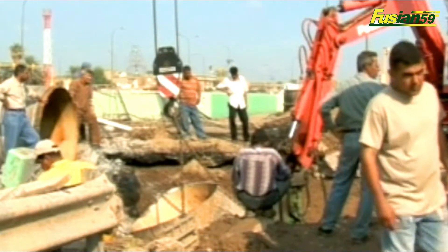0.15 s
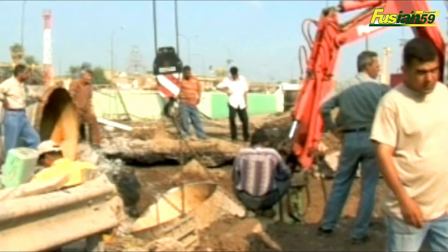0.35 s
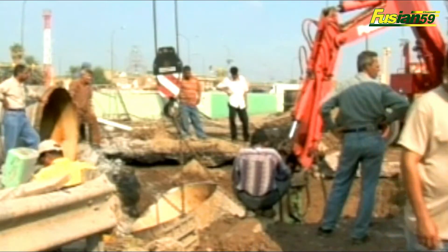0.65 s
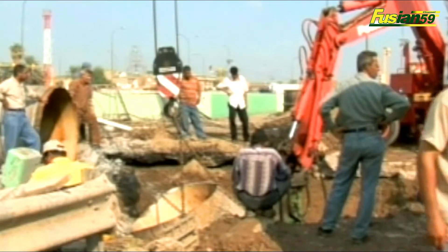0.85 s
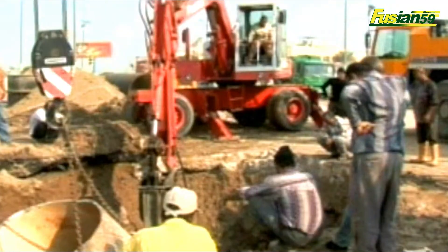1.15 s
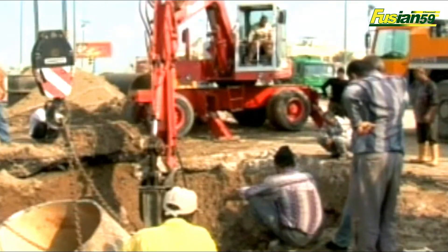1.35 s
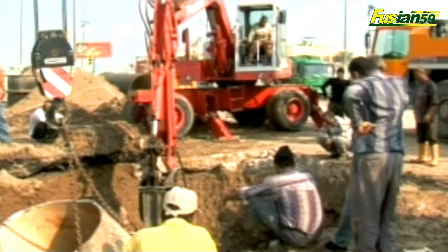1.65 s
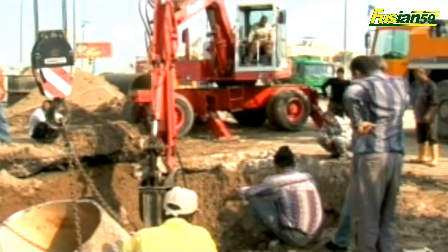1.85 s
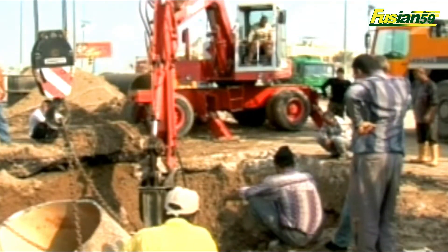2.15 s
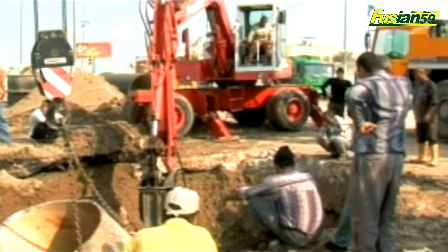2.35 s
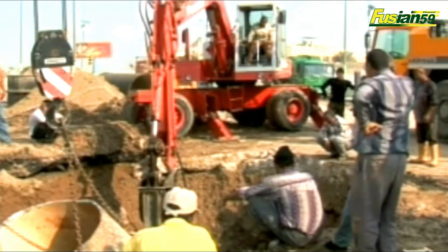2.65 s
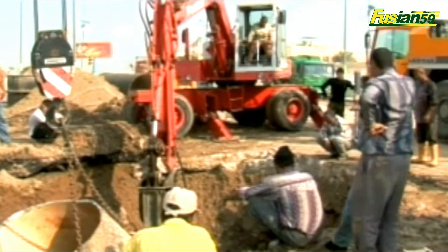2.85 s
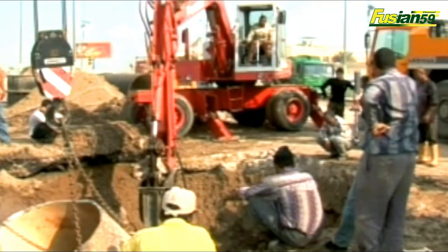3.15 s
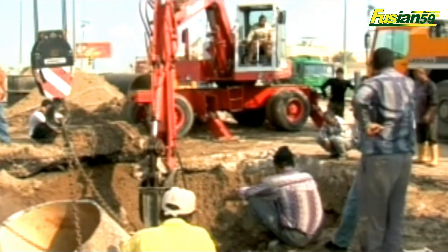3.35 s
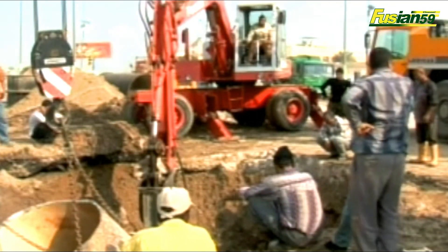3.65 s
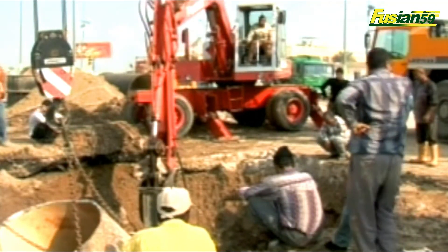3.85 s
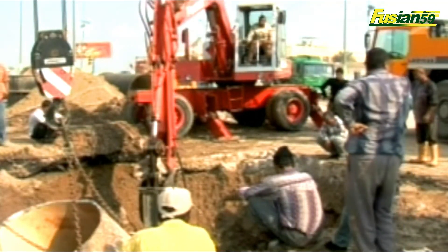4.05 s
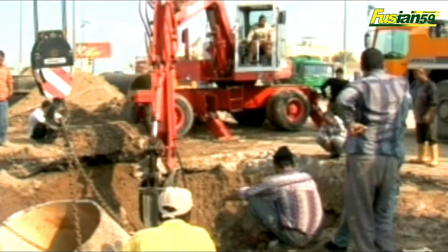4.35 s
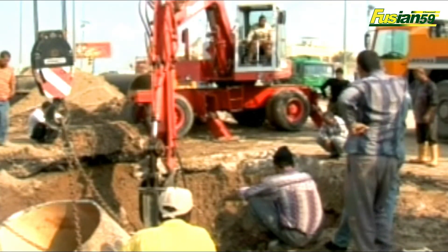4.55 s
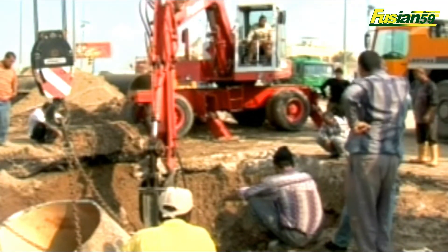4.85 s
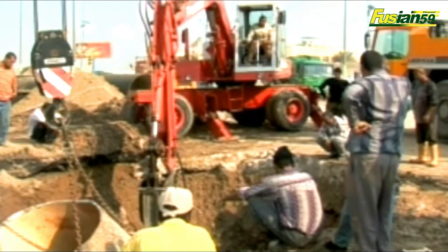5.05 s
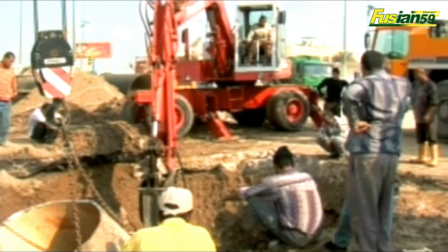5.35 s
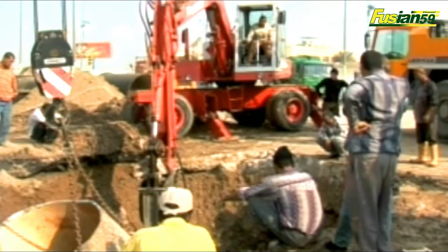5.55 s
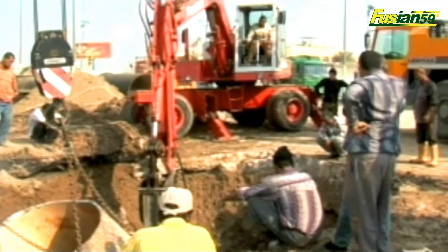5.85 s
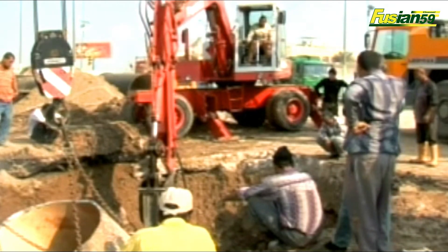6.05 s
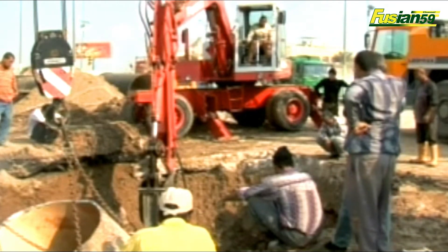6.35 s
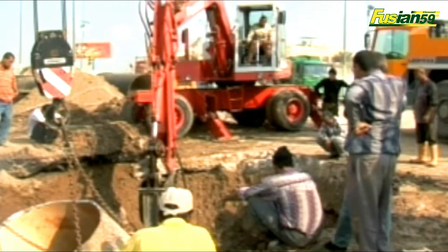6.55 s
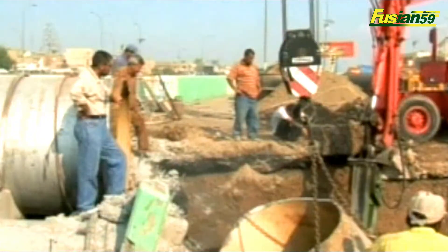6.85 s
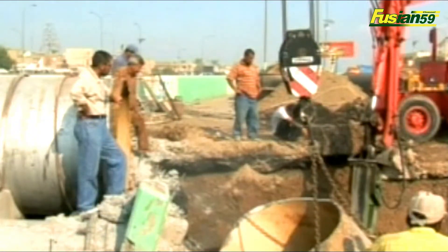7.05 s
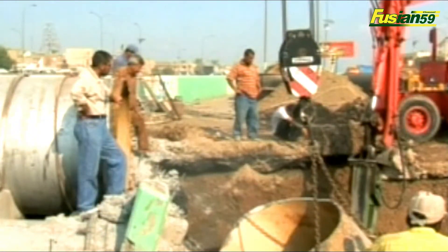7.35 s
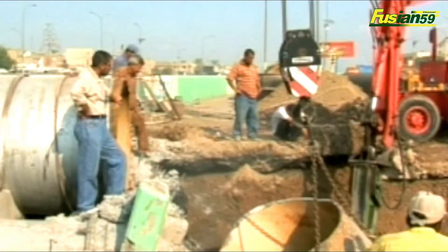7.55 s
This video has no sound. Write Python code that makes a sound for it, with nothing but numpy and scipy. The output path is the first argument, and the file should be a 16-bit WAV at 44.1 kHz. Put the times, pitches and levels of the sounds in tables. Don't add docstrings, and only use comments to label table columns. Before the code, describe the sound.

On an open building site an excavator's hydraulic breaker pounds about four and a half times a second, each blow a dense thud with ringing steel. Diesels rumble behind. After a second the view moves to the front, louder and more ringing. Midway the sound dips quickly almost to silence and returns. Near the end hammering cuts out, leaving idling engines, valve clatter and whining, hissing pump bursts.

```python
import sys
import numpy as np
from scipy import signal
from scipy.fft import rfft, irfft
from scipy.io import wavfile
from scipy.ndimage import uniform_filter1d

SR = 44100
rng = np.random.default_rng(int(sys.argv[2]) if len(sys.argv) > 2 else 0)


def elevation(decibels):
    levels = np.asarray(decibels, float)
    return 10 ** (levels / 20)


def store_pcm(level_fs):
    pcm = np.round(np.clip(level_fs, -1, 1) * 32767).astype(np.int16)
    wavfile.write(sys.argv[1], SR, np.atleast_2d(pcm).T)


N = 340452
LENGTH = 2 ** 15

# hz, level_db, t60_s
LONG_RINGS = [(396, -9, .4), (422, -3, .36), (805, -2, .42), (1294, -14, .5), (1851, -10, .6),
              (1884, -5.5, .66)]
LONG_RINGS += [(2540, -16, .42), (3265, -13, .34), (3298, -14, .42), (4200, -14, .22), (6080, -29, .26)]


def ramp(start_s, length_s):
    return np.clip((np.arange(N) / SR - start_s) / length_s, 0, 1)


def walk(rate_hz):
    k = int(SR / rate_hz)
    held = np.repeat(rng.standard_normal(N // k + 1), k)
    return uniform_filter1d(uniform_filter1d(held, k), k)[:N]


def bell(length, hz, octaves):
    frequency = np.fft.rfftfreq(length, 1 / SR) + 1
    shape = np.exp(-(np.log2(frequency / hz) / octaves) ** 2)
    return shape / np.sqrt(np.mean(shape ** 2))


def band(white, hz, octaves):
    length = 2 * white.shape[-1] - 2
    return irfft(white * bell(length, hz, octaves), length)


def rumble(spectrum, level_db):
    hz, density_db = np.transpose(spectrum)
    white, out = rfft(rng.standard_normal(2 ** 19)), 0
    for centre_hz in 28 * 2 ** np.arange(0, 9.2, .5):
        band_db = np.interp(np.log(centre_hz), np.log(hz), density_db) + 10 * np.log10(centre_hz)
        out = out + elevation(band_db + 1.74 * walk(14)) * band(white, centre_hz, 1 / 3)[:N]
    return elevation(level_db) * out / out.std()


def working_engines():
    # hz, level_db (per Hz)
    working = [(15, -47), (25, -25), (285, -3), (694, -6.5), (812, 2), (1110, -16), (1300, -2.5),
               (1730, -14), (3250, -18.5), (13000, -46)]
    return rumble(working, -50.0)


def valve_clatter(white, phase):
    # hz, width_hz, level_db
    covers = [(1077, 70, 1), (2400, 250, -5), (2957, 40, 2.5), (3680, 51, -12)]
    pulse = np.exp(0.86 * (np.cos(phase) - 1))
    clatter = sum(elevation(db) * np.sqrt(width) * band(white, hz, width / hz)[:N] for hz, width, db in covers)
    return pulse * clatter / clatter.std()


def loaded_pump(white, phase):
    # start_s, length_s, whine_db
    pump_loads = [
        (6.8, .23, -70.5),
        (7.068, .02, -70),
        (7.157, .015, -75),
        (7.27, 0.41, -72.5),
    ]
    whine_hz, hiss_hz, slew_s, hiss_db = 4860, 7750, 0.011, -12.5
    load = 0
    for start_s, length_s, db in pump_loads:
        load = load + elevation(db) * ramp(start_s, slew_s) * (1 - ramp(start_s + length_s, slew_s))
    tone = np.sin(2 * np.pi * np.cumsum(whine_hz * (1 + .012 * walk(200))) / SR)
    throb = 1 + .85 * np.cos(4 * phase)
    whine = load * elevation(-.5 + 3.5 * walk(110)) * throb * tone
    flow = bell(2 ** 19, hiss_hz, .09) + elevation(7.5) * bell(2 ** 19, whine_hz, 0.65)
    hiss = load * elevation(hiss_db + 4.5) * irfft(white * flow)[:N]
    return whine + hiss


def idling_site():
    # hz, level_db (per Hz)
    idling = [(15, -46), (25, -16), (293, -0.5), (1050, -3.5), (2440, -8.5), (2700, -16), (3000, -9),
              (3420, -14.5), (4940, -22.5), (13000, -36.5)]
    level_db, clatter_hz = -54.5, 20.77
    white = rfft(rng.standard_normal(2 ** 19))
    phase = 2 * np.pi * np.cumsum(clatter_hz * (1 + 0.025 * walk(1.9))) / SR
    clatter = elevation(level_db - 6.0) * valve_clatter(white, phase)
    return rumble(idling, level_db) + clatter + loaded_pump(white, phase)


def blow_run(first_s, period_s, db, count, slowing=((0, 0), (1, 0)), sag_db=0):
    periods = period_s + np.interp(np.arange(count), *np.transpose(slowing))
    start_s = first_s + np.cumsum(periods) - periods
    return np.transpose([start_s, db + sag_db * (start_s - first_s)])


def place(blows, sounds, lag_s):
    track = np.zeros(N + 2 * SR)
    for (start_s, db), sound in zip(blows, sounds):
        i = int((start_s + lag_s + 1) * SR)
        track[i:i + len(sound)] += elevation(db) * sound
    return track[SR:SR + N]


def housing(modes, peak_s, level_db):
    t = np.arange(LENGTH) / SR
    swell = (t / peak_s * np.exp(1 - t / peak_s)) ** 2
    tones = sum(elevation(db) * np.cos(2 * np.pi * hz * (t - peak_s)) for hz, db in modes)
    return elevation(level_db) * swell * tones


def shaking(blows, body, plates, echo_s, echo_db, strike=0.5, linger=1.3, drift=0.12):
    t = np.arange(LENGTH // 2) / SR
    f = np.fft.rfftfreq(len(t), 1 / SR)
    colour = 1 + sum((elevation(db) - 1) / (1 + (2 * (f - hz) / width) ** 2) for hz, width, db in plates)
    white = colour * rfft(rng.standard_normal((len(blows) + 2, len(t))))
    hz, *columns = np.transpose(body)
    same, loose = 0, 0
    for centre_hz in 40 * 2 ** (np.arange(26) / 3):
        db, rise, t60, like = (np.interp(np.log(centre_hz), np.log(hz), c) for c in columns)
        like = np.clip(like, 0, 1)
        onset = np.minimum(t / 0.0035, 1) ** 2
        swell = elevation(db) * onset * (1 - (1 - strike) * np.exp(-(t / rise) ** 2))
        late = np.maximum(t - echo_s, 0)
        echo = elevation(echo_db - 60 * late / t60) * np.minimum(late / 0.0079, 1)
        shape = swell * (elevation(-60 * t / t60) + echo)
        noise = band(white, centre_hz, 1 / 4)
        same = same + np.sqrt(like) * shape * noise[:2]
        loose = loose + np.sqrt(1 - like) * swell * elevation(-60 * t / (linger * t60)) * noise[2:]
    turn = drift * np.array(blows)[:, :1]
    return np.cos(turn) * same[0] + np.sin(turn) * same[1] + loose


def steel(modes, bright_db, rise_s, lead_s, scatter, twin_db, split):
    t = np.arange(LENGTH) / SR
    hz, db, t60 = np.transpose(sorted(modes))[..., None]
    high = hz / 4000
    sense = (-1) ** np.arange(len(hz))[:, None]
    grow = 1 - np.exp(-(t / (rise_s * (0.5 + high))) ** 2)
    rings = sense * elevation(db - 60 * t / t60) * grow * np.exp(2j * np.pi * hz * (t + lead_s))
    offset_hz = hz * split * (1 + rng.random(hz.shape)) * sense
    twins = elevation(twin_db) * np.minimum(high, 1) ** 2 * rings * np.exp(2j * np.pi * offset_hz * t)
    draws = rng.standard_normal((len(bright_db), 4, len(hz)))
    size, turn, real, imag = np.moveaxis(draws, 1, 0)
    bright = elevation(np.outer(bright_db, high))
    load = np.exp(scatter * np.minimum(0.19 + high.T ** 2, 1) * (size + 1j * turn))
    ring = (bright * load) @ rings + (bright * (real + 1j * imag)) @ twins
    return ring.imag * np.minimum(20 * (t[-1] - t), 1)


def breaker(blows, body, plates, modes, bright_db, body_db, steel_db, echo_s, echo_db, rise_s, lead_s):
    ring = steel(modes, bright_db, rise_s, lead_s, scatter=0.36, twin_db=-3.0, split=0.0061)
    ring[:, :LENGTH // 2] += elevation(body_db - steel_db) * shaking(blows, body, plates, echo_s, echo_db)
    return elevation(steel_db) * ring


def side_breaker(blows):
    # hz, level_db, rise_s, t60_s, likeness (of blows, 0-1)
    body = [(50, -55, .02, 0.29, .95), (100, -28, 0.031, 0.47, 0.7), (203, -5, 0.0025, 0.21, 0.9),
            (330, -10.5, 0.0027, 0.23, 1), (786, -0.5, 0.01, 0.25, 0.91), (1570, -4.5, 0.012, 0.17, 0.94),
            (2150, -9, 0.01, 0.23, 1), (3480, -7.5, 0.014, 0.19, 0.9), (7000, -10.5, 0.0031, .17, 0.5),
            (10500, -11.5, 0.0031, 0.095, 0), (13500, -34, .003, 0.11, .1)]
    # hz, width_hz, lift_db
    plates = [(335, 70, 6.5), (568, 29, 4.5), (750, 69, 4), (1564, 130, 11.5), (2650, 96, 8),
              (3280, 370, 8), (4090, 120, 10.5)]
    # hz, level_db, t60_s
    modes = [(325, -5, 0.25), (429, -13.5, 0.49), (523.4, -9.5, 0.42), (790, -5, 0.33), (954, -6, 0.3),
             (1192, -13.0, 0.39), (1336, -12.5, 0.47), (1560, -18, 0.22), (1900, -15.5, 0.39),
             (2460, -33, 0.27), (2515, -15.5, 0.38), (3230, -10.5, 0.31), (3490, -32, 0.47),
             (3520, -18, 0.25), (4050, -5, 0.13), (4200, -11.5, 0.23), (4180, -3, 0.16), (4926, -42, 0.48),
             (5900, -27, 0.2), (7418, -10, 0.16), (105.3, -5, 0.2), (3300, -11.5, 0.34),
             (7000, -17.5, 0.23), (748.0, 3, .12), (1644, -6, .1)]
    bright_db = [-3, 0.5, 1, -1.5, 3.5, 3.5]
    # hz, level_db
    boom = [(325, 0)]
    sounds = breaker(blows, body, plates, modes, bright_db, body_db=-6, steel_db=1,
                     echo_s=0.0077, echo_db=-7, rise_s=0.025, lead_s=.003)
    return sounds + housing(boom, peak_s=.009, level_db=9)


def front_breaker(blows):
    # hz, level_db, rise_s, t60_s, likeness (of blows, 0-1)
    body = [(49.6, -39.5, 0.01, 0.6, 0.72), (107, -30.5, 0.044, 0.61, 0.75), (205, -17, 0.013, 0.2, 0.87),
            (402, -10, 0.0023, 0.28, 0.9), (1040, -3.5, 0.023, 0.15, 0.99), (1795, 0, 0.0025, 0.2, 0.6),
            (2690, -9, 0.0072, 0.19, 0.61), (3700, -5, 0.0095, 0.17, 0.84),
            (7040, -16.5, 0.0045, 0.2, 0.68), (10500, -17.5, 0.0023, 0.13, 0.056),
            (13500, -39, .003, .12, .1)]
    # hz, width_hz, lift_db
    plates = [(400, 42, 8.6), (834.4, 52, 14.3), (953, 25, 6.7), (1277, 255, 8.5), (1873, 42, 8),
              (3347, 236, 10.7), (3980, 300, 5.5), (6200, 100, 3.5), (7050, 1500, 2.8)]
    # hz, level_db, t60_s
    modes = [(104.8, -18, 0.33), (678.7, -6.5, 0.25), (933, -10, 0.2), (960, -3, 0.25), (978.7, -11, 0.095),
             (1177, -1.0, 0.19), (1238, 11.0, 0.073), (1466, -5.0, 0.23), (1552, -1.0, 0.13),
             (1730, -28, 0.18), (2274, -9, 0.22), (2386, -12.5, 0.28), (3286, -6, 0.12), (3517, -4.5, 0.15),
             (3880, -5.0, 0.1), (4970, -15, 0.21), (7000, -22, 0.29)] + LONG_RINGS
    # hz, level_db
    boom = [(915, -8), (940, -4), (973, -0.5)]
    sounds = breaker(blows, body, plates, modes, np.zeros(len(blows)), body_db=-4.5, steel_db=-1.0,
                     echo_s=0.032, echo_db=-17.5, rise_s=0.011, lead_s=0.003078)
    return sounds + housing(boom, peak_s=.023, level_db=0.5)


def scene():
    # first_s, period_s
    side_run = (-.19335, .22945)
    front_run = (.8899, .22268)
    later_run = (2.9379, .2223)
    # blow_number, longer_s
    binding = [
        (0, 0),
        (10, .0016),
        (16, .0006),
    ]
    front_cut_s, dip_s, idle_cut_s, cut_s = 1.0535, 2.92, 6.7577, .002
    fade_s, fade_bend = 0.11, 0.74

    engines = working_engines()
    aside = blow_run(*side_run, db=-28.5, count=6)
    ahead = blow_run(*front_run, db=-24.5, count=10)
    later = blow_run(*later_run, db=-24, count=18, slowing=binding, sag_db=-0.21)
    side = side_breaker(aside)
    front = front_breaker(np.vstack([ahead, later]))

    to_front = ramp(front_cut_s, cut_s)
    to_idle = ramp(idle_cut_s - cut_s / 2, cut_s)
    fade_out = (1 - ramp(dip_s - fade_s, fade_s)) ** fade_bend
    fade_in = ramp(dip_s, fade_s) ** fade_bend
    near_engines = elevation(3.0) * engines
    mix = (place(aside, side, 0.00159) + engines) * (1 - to_front)
    mix += (place(ahead, front, .0006) + near_engines) * to_front * fade_out
    mix += (place(later, front[len(ahead):], 0.0018) + near_engines) * fade_in * (1 - to_idle)
    mix += idling_site() * to_idle
    return mix[None] + elevation(-23) * engines


def roll_off(x):
    return signal.sosfilt(signal.butter(12, 15700, fs=SR, output="sos"), x)


def record(dry):
    top_hz = 13400
    low = signal.sosfiltfilt(signal.ellip(8, .1, 50, top_hz, fs=SR, output="sos"), dry)
    top = elevation(-23) * (dry - low)
    return roll_off(low + top)


dry = scene()
out = record(dry)
store_pcm(out)
```